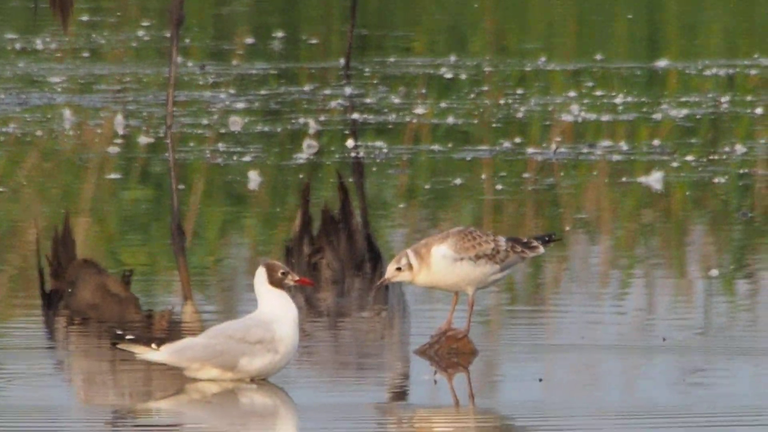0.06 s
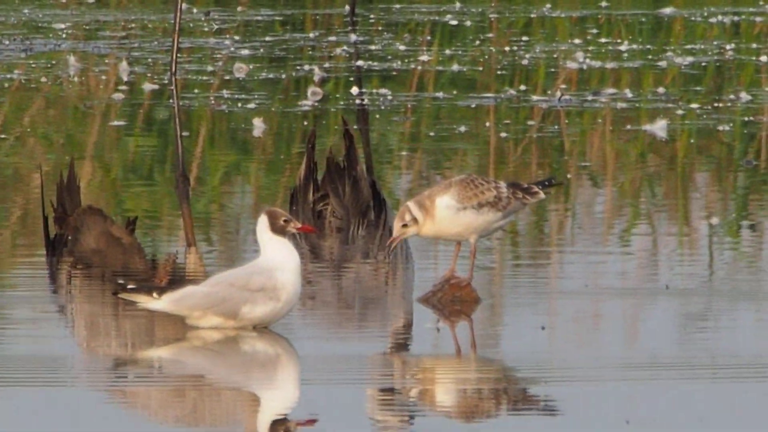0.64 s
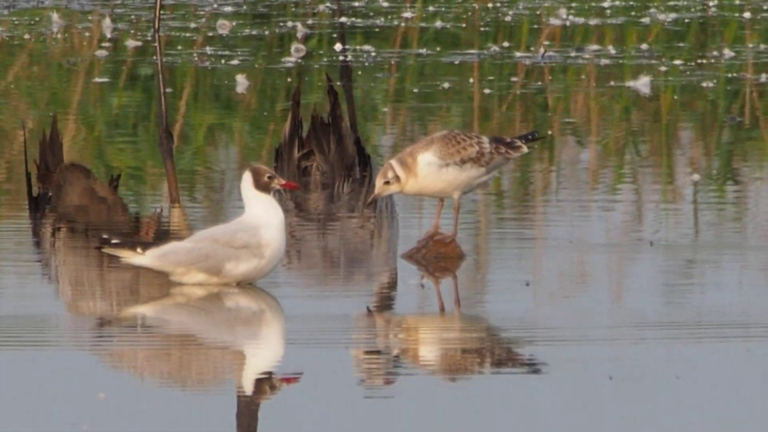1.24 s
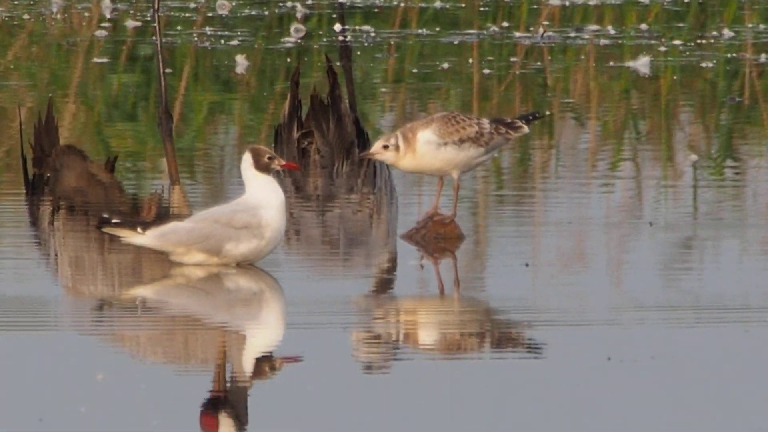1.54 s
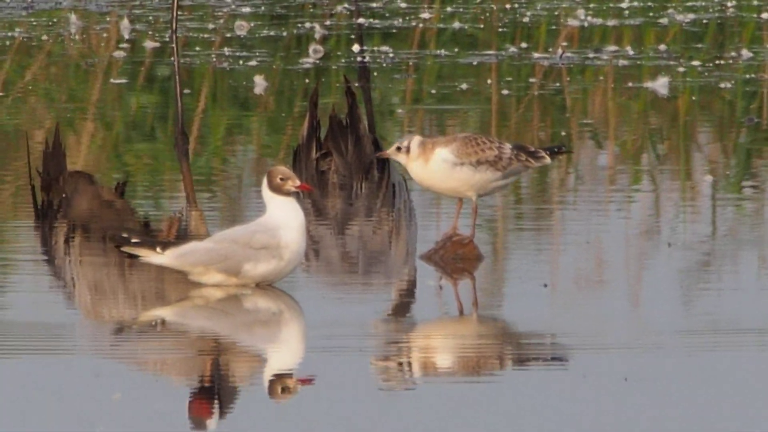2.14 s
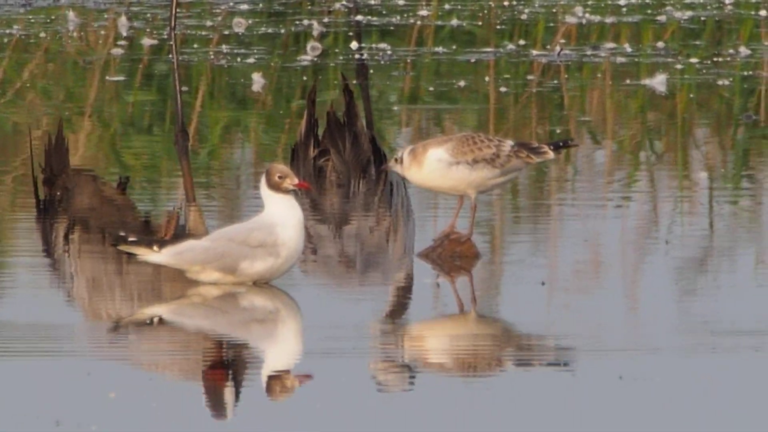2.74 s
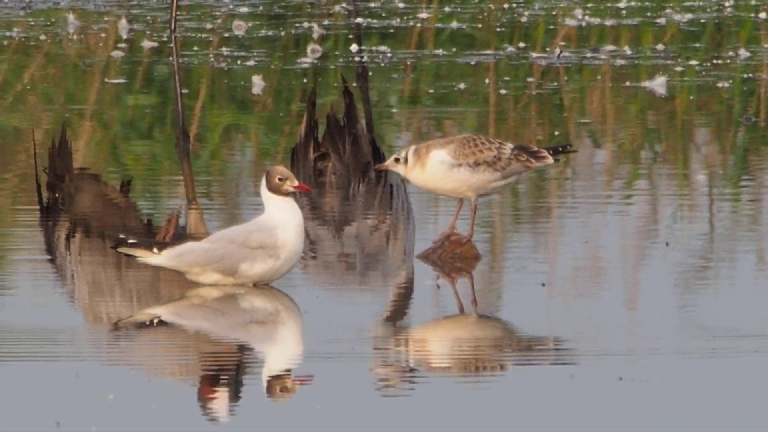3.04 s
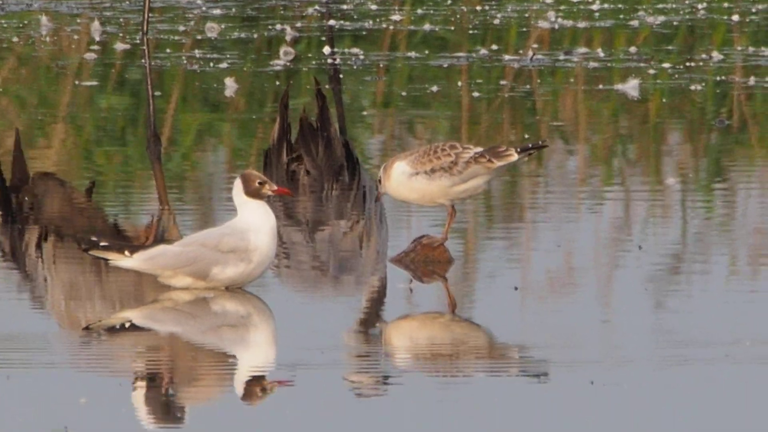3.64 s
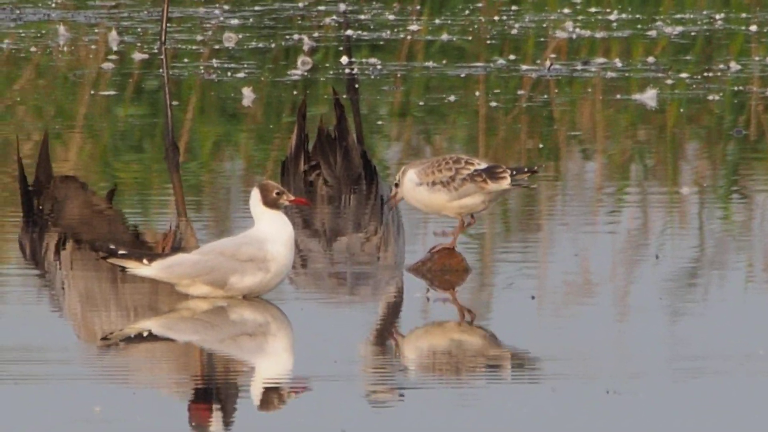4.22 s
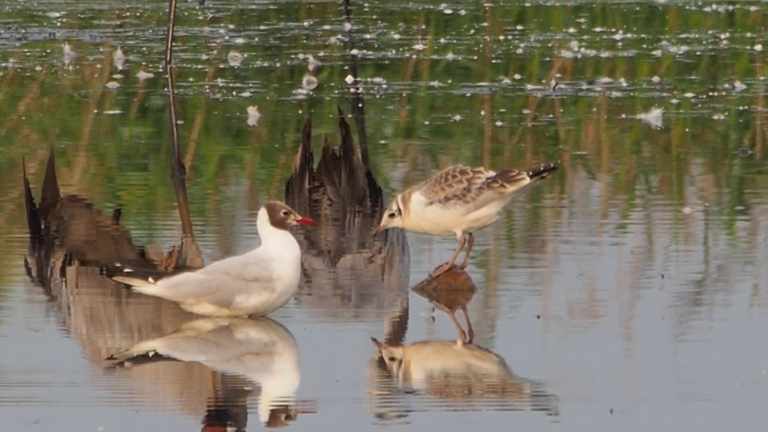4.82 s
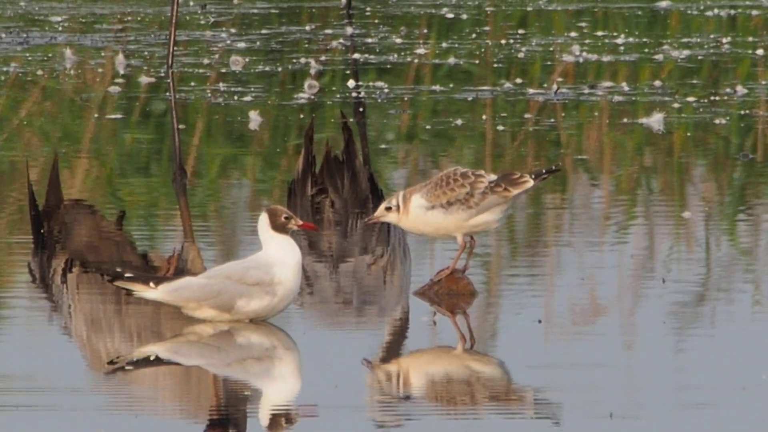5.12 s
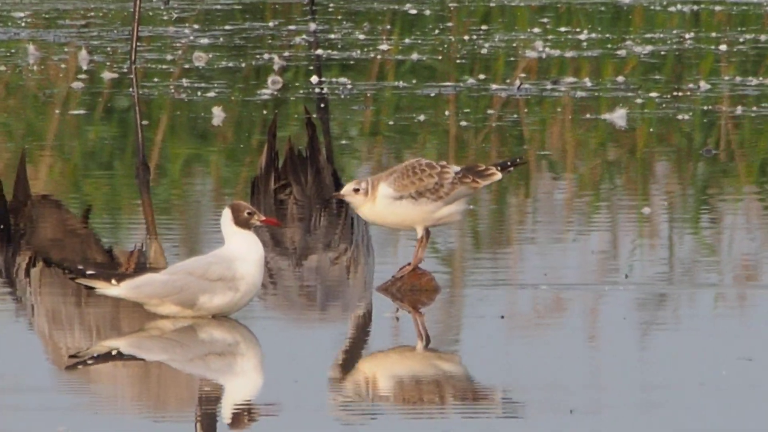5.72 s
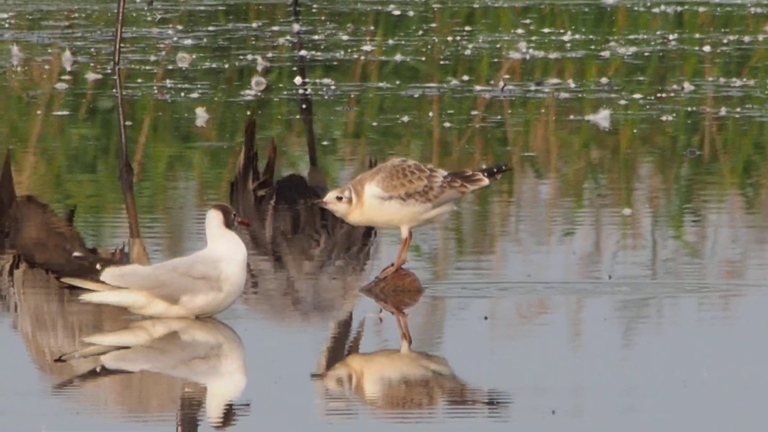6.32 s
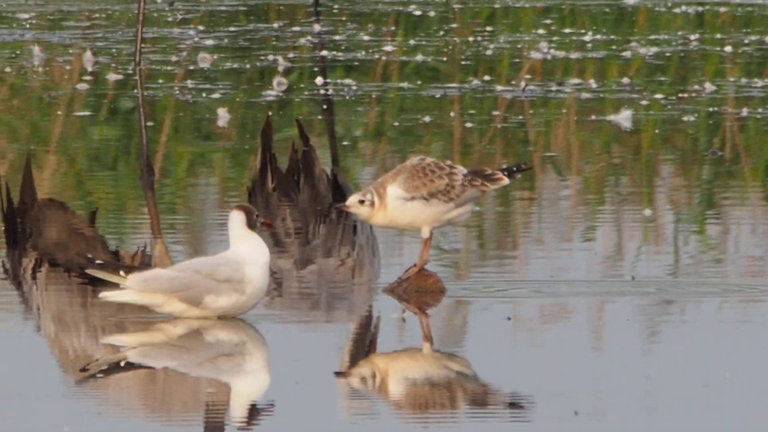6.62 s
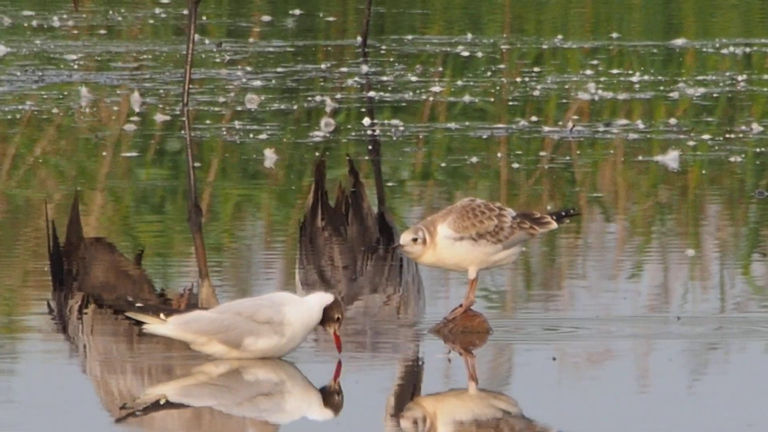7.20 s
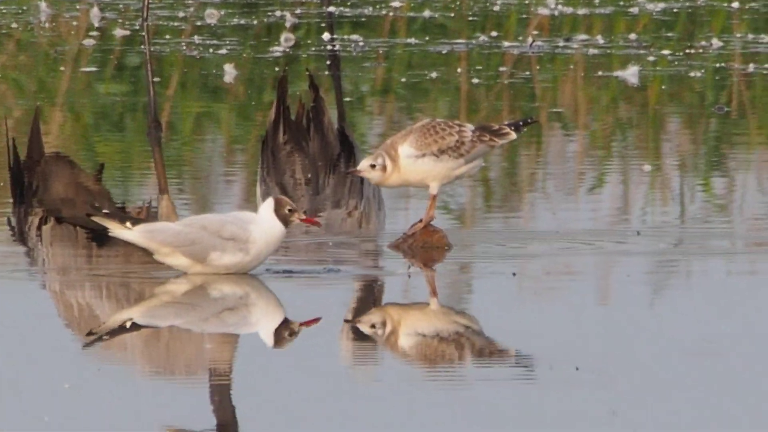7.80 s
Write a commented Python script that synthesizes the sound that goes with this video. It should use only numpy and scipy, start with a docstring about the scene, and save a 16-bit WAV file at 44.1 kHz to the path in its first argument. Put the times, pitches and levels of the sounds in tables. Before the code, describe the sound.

A young gull repeats thin, high, falling begging whistles over a soft rumble and hiss, with one sharp close click.

```python
"""A young gull begs beside shallow water: eight thin whistles that rise quickly and sink slowly.
A membrane in its syrinx oscillates almost sinusoidally, so the tone is nearly pure; in the weak calls
the other side of the syrinx adds a second tone. Other birds chip far off, and stems and banks scatter
the voices. Something hard clicks once next to the microphone, an impulse exciting damped resonances.
A steady distant rumble and a soft hiss lie underneath."""
import sys
import numpy as np
from scipy import signal
from scipy.fft import rfft, irfft
from scipy.io import wavfile
from scipy.ndimage import uniform_filter1d

SR = 44100
rng = np.random.default_rng(int(sys.argv[2]) if len(sys.argv) > 2 else 0)


def write(x):
    x = np.atleast_2d(x).T
    wavfile.write(sys.argv[1], SR, np.round(np.clip(x, -1, 1) * 32767).astype(np.int16))


N = 350595
TIME = np.arange(N) / SR
FREQS = np.maximum(np.arange(N // 2 + 1) * SR / N, 1)

# Begging calls: start t/s, rise/s, hold/s, fall/s, start f/Hz, top f/Hz, end f/Hz,
# exponent of the fall (1 = straight), level/dB, attack/s, release/s
BEGGING_CALLS = [(.335, .075, 0.033, 0.25, 4400, 5030, 3970, 1.4, -52, 0.049, 0.22),
                 (1.62, 0.14, .005, 0.19, 4530, 5050, 4250, 0.93, -53.5, 0.059, 0.16),
                 (2.62, 0.06, .125, .19, 4120, 4760, 3420, 1, -59.5, .01, .1),
                 (3.56, 0.055, 0.097, 0.18, 4650, 4840, 3580, 1.05, -64.5, .05, .04),
                 (4.49, 0.066, .115, 0.16, 4050, 4870, 3440, 1, -62.5, .06, .06),
                 (5.501, .095, .015, 0.06, 4130, 5910, 4530, 1.7, -57.5, .003, 0.018),
                 (6.315, .088, .022, 0.28, 4400, 5390, 4020, 1.02, -50, 0.021, 0.15),
                 (7.577, 0.091, .026, .236, 4370, 5250, 4080, 1.07, -46.5, 0.017, 0.18)]
# The voice cracks and stays lower for the rest of the call: t/s, drop/Hz
VOICE_CRACKS = [(1.858, 640), (7.705, 80.2)]
# The voice sags briefly and recovers: t/s, half length/s, drop/Hz, loss/dB
VOICE_SAGS = [(.518, .042, 328, 2.5), (1.916, 0.019, 180, 0), (5.568, .022, 260, -1)]
# Other side of the syrinx: top t/s, half length/s, top f/Hz, level/dB, loss of the main tone/dB
SPLIT_TONES = [(2.72, .065, 5380, -71, 15), (3.655, .08, 5520, -69, 2.5), (4.607, 0.044, 6200, -68.5, 5),
               (5.572, .035, 5070, -70, 1)]
# Two faint far whistles: top t/s, half length/s, top f/Hz, level/dB, bend/(Hz/s^2)
FAR_WHISTLES = [(1.585, .05, 1380, -67, 12000), (7.373, .036, 6900, -65, 650000)]
# Chips of distant birds: top t/s, top fundamental f/Hz, third harmonic level/dB, fourth harmonic level/dB
FAR_CHIPS = [(.853, 1410, -74, -61.5), (.925, 1410, -65, -69), (1.305, 1620, -66, -63),
             (1.395, 1414, -77, -61), (1.451, 1600, -64, -60), (1.913, 1590, -67, -64),
             (2.04, 1520, -77.5, -60), (3.149, 1250, -75, -68), (4.886, 1305, -74, -66),
             (6.76, 1450, -77, -68), (6.905, 1500, -76, -67), (7.533, 1440, -76, -65),
             (7.565, 1500, -64, -66)]
# The click and its rebounds: t/s, relative level/dB
CLICK_IMPULSES = [(1.167, 0), (1.1702, -12), (1.17, -7)]
# Broad resonances of the clicking part: f/Hz, bandwidth/Hz, left gain/dB, right gain/dB
CLICK_MODES = [(350, 510, -7, 3), (1200, 340, -14, 2), (2150, 300, -7, 9), (4000, 240, 14, 9),
               (4400, 390, -13, 11), (5680, 450, 0, 13), (7140, 820, -4, 18), (9150, 1200, 13, 15.5),
               (12200, 2900, -9, 16), (15900, 1100, -6, 11.5)]
# Spectral density of the rumble and hiss: f/Hz, relative level/dB
NOISE_SPECTRUM = [(15, -11), (28, -18), (55, 0.5), (74, 1.5), (100, -2), (200, -3), (350, -12), (600, -9),
                  (1000, -14.5), (1650, -22), (2400, -21.5), (3100, -18.5), (5000, -21), (15000, -32)]
# Narrow humps and hollows in that spectrum: f/Hz, Gaussian width/Hz, gain/dB
NOISE_HUMPS = [(486, 48, 4.5), (815, 43, -2.5), (1045, 102, 3.5), (1443, 66, 4.5), (1630, 53, -2),
               (1887, 132, 4)]
# Likeness of that noise on the left and right: f/Hz, correlation coefficient
NOISE_CORRELATION = [(30, 0.91), (100, 0.67), (250, 0.44), (600, 0.47), (1200, 0.11), (2800, -0.26),
                     (5000, -0.084), (14000, 0.043)]
# Dips in the microphone's response: f/Hz, half width/Hz, gain/dB
MICROPHONE_DIPS = [(6560, 440, -12), (10460, 800, -13)]


def young_gull(rasp_gain_db, rasp_hz, rasp_width_hz):
    """The two sides of the syrinx are separate oscillators; an undertone and noise add hoarseness."""
    wobble_hz = 20 * drift(rate_hz=17.3)
    calls = [unsteady_voice(*begging_contour(*row), wobble_hz) for row in BEGGING_CALLS]
    splits = [arch_contour(s, half_s, hz, db, bend=100000) for s, half_s, hz, db, _ in SPLIT_TONES]
    undertones = [call * [1, .6, 1] + [0, 0, -24.5] for call in calls]  # 0.6 of the pitch, 24.5 dB down
    main = syrinx(calls, jitter=.004, flutter_db=2.0, octave_db=-26, fade_s=.008)
    second = syrinx(splits, jitter=.009, flutter_db=4.0, octave_db=-30, fade_s=.012)
    under = syrinx(undertones, jitter=.08, flutter_db=3.0, octave_db=-30, fade_s=.02)
    effort = np.abs(uniform_filter1d(main ** 2, size=1500)) ** .25  # square root of the running rms
    sputter = from_db(3 * drift(rate_hz=60))
    rasp = unit_rms(resonate(rng.standard_normal(N), rasp_hz, rasp_width_hz) * sputter)
    return main + second + under + from_db(rasp_gain_db) * effort * rasp


def begging_contour(start_s, rise_s, hold_s, fall_s, start_hz, top_hz, end_hz, bow, db,
                    attack_s, release_s):
    """Oscillation starts and stops at a threshold; pitch climbs, holds, sinks. Gives t/s, f/Hz, level/dB."""
    threshold_db = -67
    end_s = start_s + rise_s + hold_s + fall_s
    s = TIME[(TIME >= start_s) & (TIME < end_s)]
    to_climb = np.clip(1 - (s - start_s) / rise_s, 0, 1) ** 2.4  # the rise flattens towards the top
    fallen = np.clip(1 - (end_s - s) / fall_s, 0, 1) ** bow
    effort = np.minimum(np.minimum((s - start_s) / attack_s, (end_s - s) / release_s), 1)
    hz = top_hz + (start_hz - top_hz) * to_climb + (end_hz - top_hz) * fallen
    return s, hz, threshold_db + (db - threshold_db) * effort


def unsteady_voice(s, hz, db, wobble_hz):
    """A young voice is an unsteady oscillator, and weakens while a second tone shares its airflow."""
    cracked_hz = sum(drop_hz * (s > at_s) for at_s, drop_hz in VOICE_CRACKS if at_s > s[0])
    hz = hz + np.interp(s, TIME, wobble_hz) - cracked_hz
    for at_s, half_s, drop_hz, loss_db in VOICE_SAGS:
        sag = np.exp(-((s - at_s) / half_s) ** 2)
        hz, db = hz - drop_hz * sag, db - loss_db * sag
    for at_s, half_s, _, _, loss_db in SPLIT_TONES:
        db = db - loss_db * np.exp(-((s - at_s) / half_s) ** 2)
    return np.column_stack([s, hz, db])


def arch_contour(top_s, half_s, top_hz, db, bend):
    """Parabolic frequency modulation at constant level. Gives rows of t/s, f/Hz, level/dB."""
    s = TIME[np.abs(TIME - top_s) < half_s]
    return np.column_stack([s, top_hz - bend * (s - top_s) ** 2, np.full(len(s), db)])


def syrinx(contours, jitter, flutter_db, octave_db, fade_s):
    """A membrane in nearly simple harmonic motion, randomly modulated in frequency and amplitude."""
    tremble = 1 + jitter * drift(rate_hz=210)
    flutter = flutter_db * drift(rate_hz=34)
    out = np.zeros(N)
    for contour in contours:
        s, hz, db = np.transpose(contour)
        outside_s = np.maximum(s[0] - TIME, TIME - s[-1])
        on = outside_s < fade_s
        phase = 2 * np.pi * np.cumsum(np.interp(TIME[on], s, hz) * tremble[on]) / SR
        fade = np.clip(1 - outside_s[on] / fade_s, 0, 1)
        level = from_db(np.interp(TIME[on], s, db) + flutter[on]) * fade
        out[on] += np.sqrt(2) * level * (np.sin(phase) + from_db(octave_db) * np.sin(2 * phase))
    return out


def click(gain_db, rattle_db, rattle_t60, left_lag_s):
    """Impulse excitation: a snap, two rebounds and a brief rattle drive the modes of a small stiff part."""
    force = np.zeros(N)
    for s, db in CLICK_IMPULSES:
        force[round(s * SR)] += from_db(db)
    age = TIME - CLICK_IMPULSES[0][0]
    rattle_envelope = from_db(rattle_db - 60 * np.abs(age) / rattle_t60) * (age > 0)
    force += rattle_envelope * rng.standard_normal(N)
    left, right = sum((-1) ** k * from_db([[left_db], [right_db]]) * resonate(force, hz, width)
                      for k, (hz, width, left_db, right_db) in enumerate(CLICK_MODES))
    return from_db(gain_db) * np.array([np.roll(left, round(left_lag_s * SR)), right])


def far_birds(rise_s, sweep, fall_share):
    """Arched frequency sweeps: two whistles, and chips of which only harmonics 3 and 4 carry this far."""
    arches = [arch_contour(*row) for row in FAR_WHISTLES]
    out = syrinx(arches, jitter=.0064, flutter_db=2.0, octave_db=-30, fade_s=.006)
    tremble = 1 + .018 * drift(rate_hz=250)
    for top_s, hz, third_db, fourth_db in FAR_CHIPS:
        on = (TIME > top_s - rise_s) & (TIME < top_s + fall_share * rise_s)  # breaks off on the way down
        from_top = (TIME[on] - top_s) / rise_s
        phase = 2 * np.pi * np.cumsum(hz * (1 - sweep * from_top ** 2) * tremble[on]) / SR
        swell = np.sqrt(2) * signal.windows.tukey(len(from_top), .5)
        harmonics = from_db(third_db) * np.sin(3 * phase) + from_db(fourth_db) * np.sin(4 * phase)
        out[on] += swell * harmonics
    return out


def reeds(x, t60, delay_s):
    """Diffuse scattering by stems and banks gives an exponential tail, different on each side."""
    t = TIME[:SR]
    tail = rng.standard_normal((2, SR)) * from_db(-60 * t / t60) * (t > delay_s)
    tail /= np.sqrt(np.sum(tail ** 2, axis=1, keepdims=True))
    return signal.fftconvolve(x[None], tail, axes=1)[:, :N]


def rumble_and_hiss(level_db, waver_db, right_db):
    """Spatial coherence falls with frequency: far rumble is alike on both sides, the hiss is diffuse."""
    mid, side = rfft(rng.standard_normal((2, N)))
    correlation = np.clip(over_hz(NOISE_CORRELATION), -1, 1)
    pair = np.sqrt(1 + correlation) * mid + np.sqrt(1 - correlation) * side * [[1], [-1]]
    humps_db = sum(db * np.exp(-.5 * ((FREQS - hz) / width) ** 2) for hz, width, db in NOISE_HUMPS)
    noise = unit_rms(irfft(pair * from_db(over_hz(NOISE_SPECTRUM) + humps_db), N))
    balance = from_db([[-right_db / 2], [right_db / 2]])
    return noise * from_db(level_db + waver_db * drift(rate_hz=3.1)) * balance


def place(x, right_db, left_lag_ms):
    """Time and level cues give direction: a source on the right reaches the left later and weaker."""
    left = irfft(rfft(x) * np.exp(-2j * np.pi * FREQS * left_lag_ms / 1000), N)
    return np.array([left * from_db(-right_db / 2), x * from_db(right_db / 2)])


def resonate(x, hz, width):
    """A damped two-pole resonator with unit gain at its peak."""
    r = np.exp(-np.pi * width / SR)
    feedback = [1, -2 * r * np.cos(2 * np.pi * hz / SR), r * r]
    return signal.lfilter(np.array([1, 0, -1]) * (1 - r * r) / 2, feedback, x + 1e-18)


def drift(rate_hz):
    """Low-pass noise of unit rms wavers at up to about the given rate."""
    return unit_rms(irfft(rfft(rng.standard_normal(N)) / (1 + (FREQS / rate_hz) ** 2), N))


def over_hz(points):
    """Interpolation of (f/Hz, value) points on a logarithmic frequency axis."""
    hz, value = np.transpose(points)
    return np.interp(np.log(FREQS), np.log(hz), value)


def from_db(db):
    """Amplitude ratio: tenfold for every 20 dB."""
    return 10 ** (np.asarray(db) / 20)


def unit_rms(x):
    """Normalisation to a mean square of 1."""
    return x / np.sqrt(np.mean(x ** 2) + 1e-20)


def scene():
    """Superposition: the gull slightly right, the click close by, far birds left, rumble all round."""
    gull = young_gull(rasp_gain_db=-40.5, rasp_hz=3800, rasp_width_hz=3100)
    far = far_birds(rise_s=.02, sweep=.3, fall_share=.55)
    direct = place(gull, right_db=1.5, left_lag_ms=.03) + place(far, right_db=-4.0, left_lag_ms=-.027)
    scattered = from_db(-18) * reeds(gull, t60=.59, delay_s=.0061)
    scattered += from_db(-5) * reeds(far, t60=.27, delay_s=.0076)
    snap = click(gain_db=-1.5, rattle_db=-24.5, rattle_t60=.023, left_lag_s=.0002)
    return direct + scattered + snap + rumble_and_hiss(level_db=-50.5, waver_db=.48, right_db=1.03)


def record(dry):
    """The microphone's response has two treble notches; peaks overload and a low-pass cuts the top."""
    for hz, half_width, db in MICROPHONE_DIPS:
        dry = dry - (1 - from_db(db)) * resonate(dry, hz, 2 * half_width)
    cutoff_hz = 15850
    low_pass = signal.ellip(12, .1, 80, cutoff_hz, fs=SR, output="sos")
    return signal.sosfilt(low_pass, np.clip(dry, -1, 1))


dry = scene()
out = record(dry)
write(out)
```